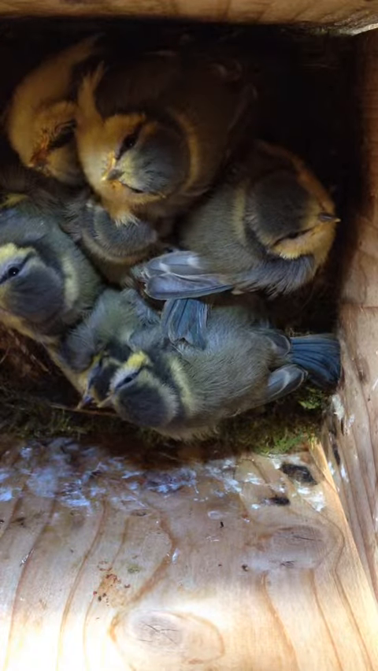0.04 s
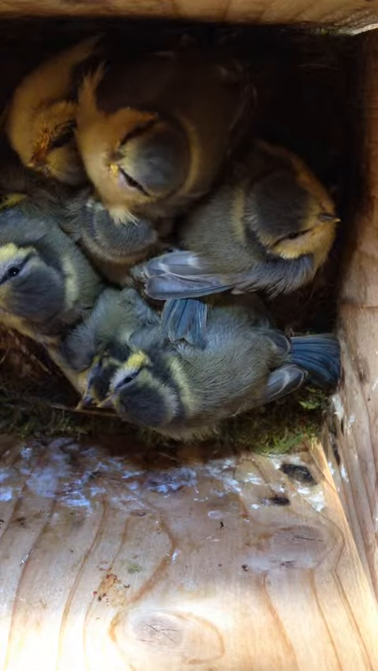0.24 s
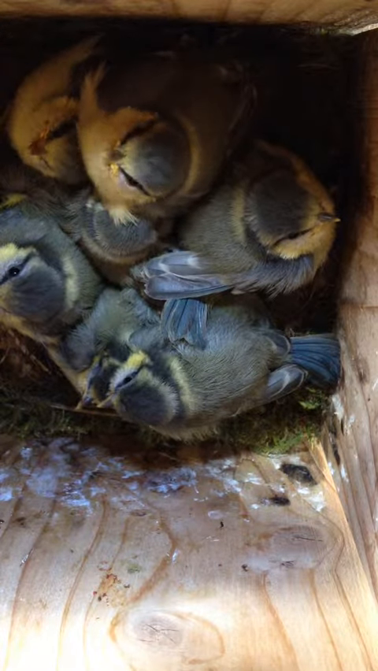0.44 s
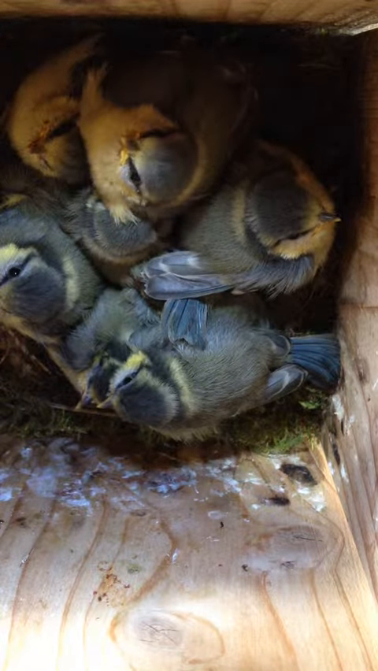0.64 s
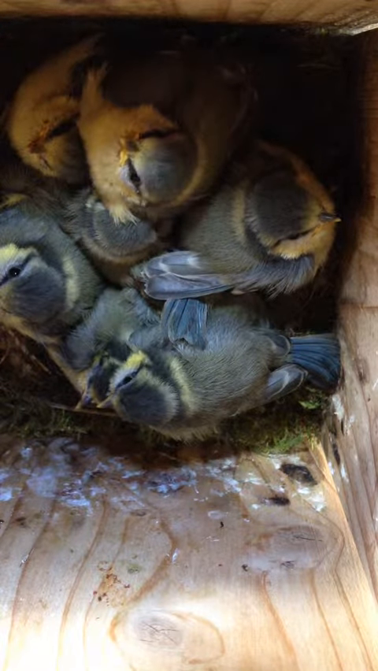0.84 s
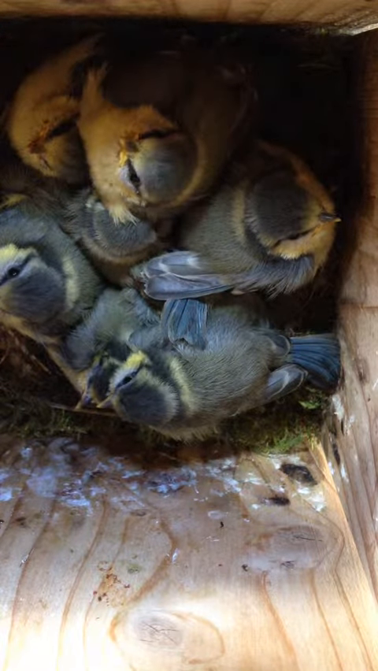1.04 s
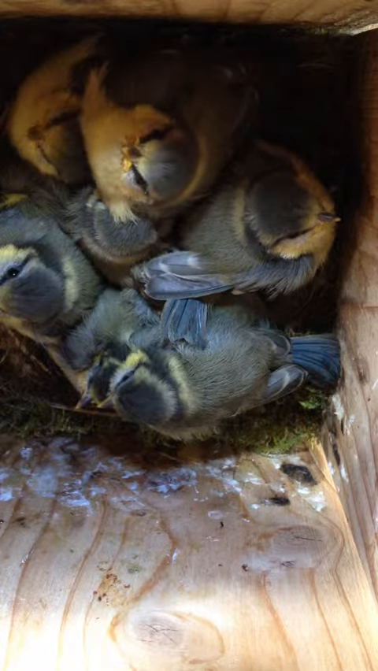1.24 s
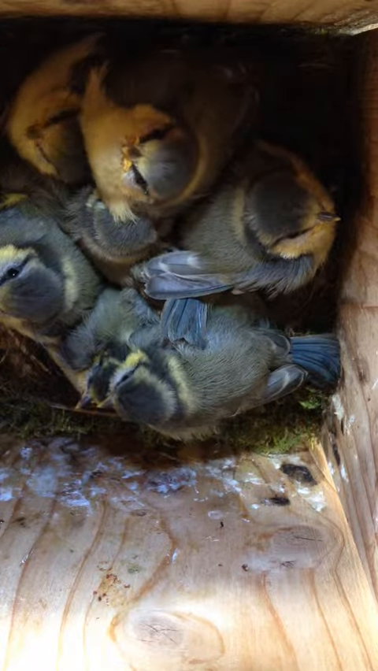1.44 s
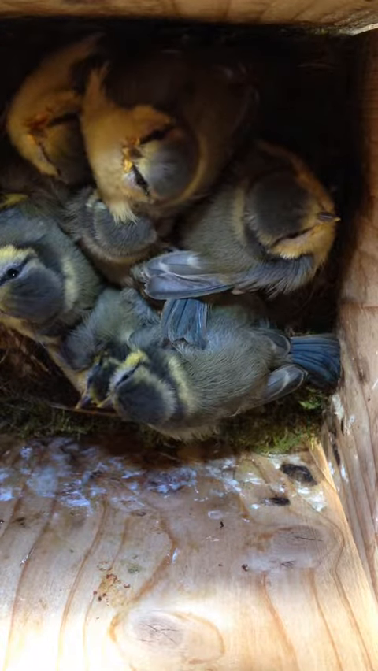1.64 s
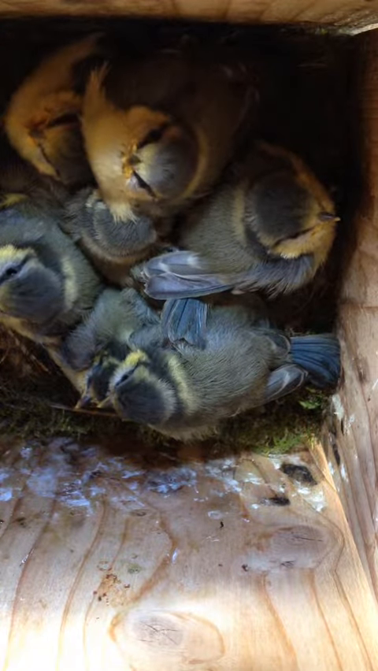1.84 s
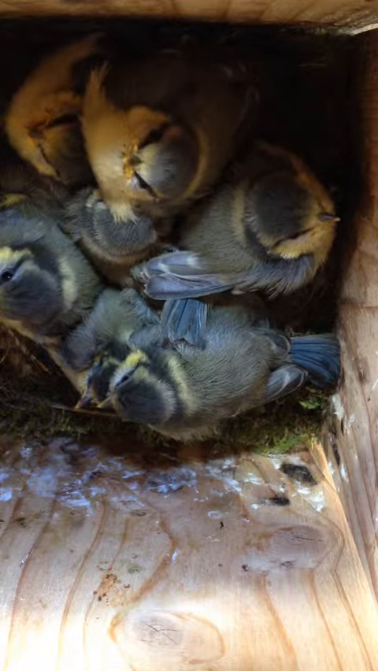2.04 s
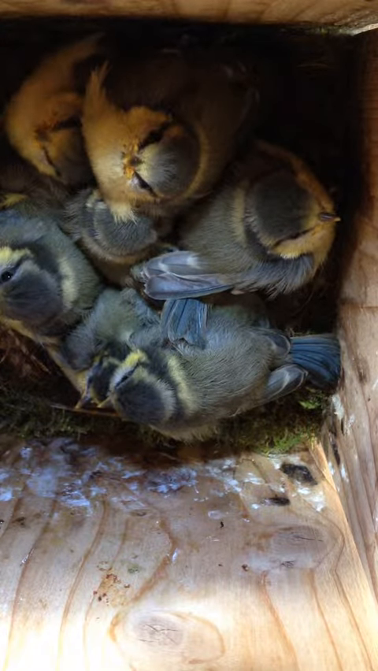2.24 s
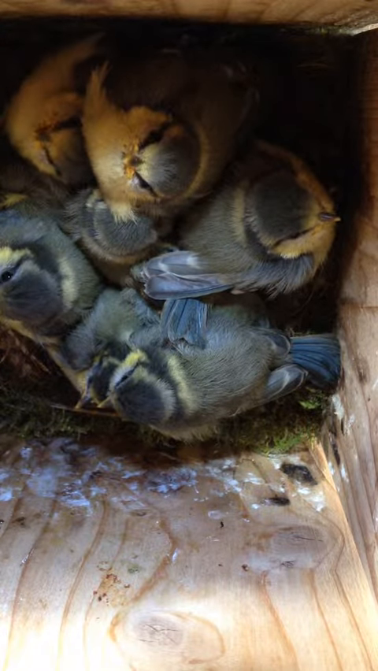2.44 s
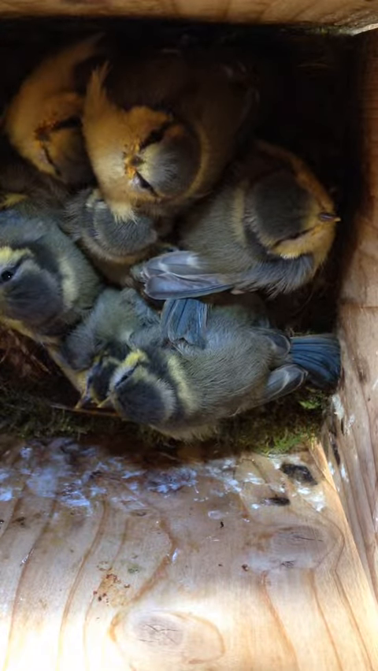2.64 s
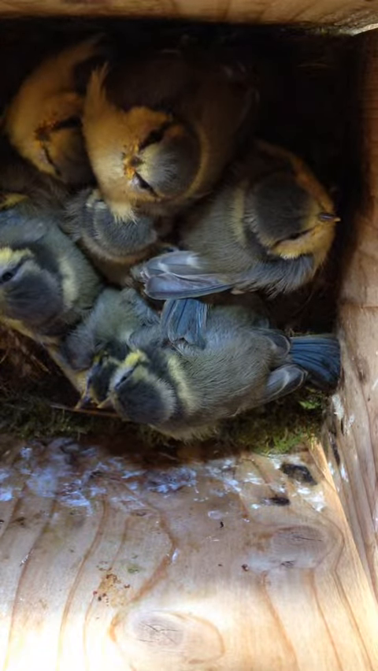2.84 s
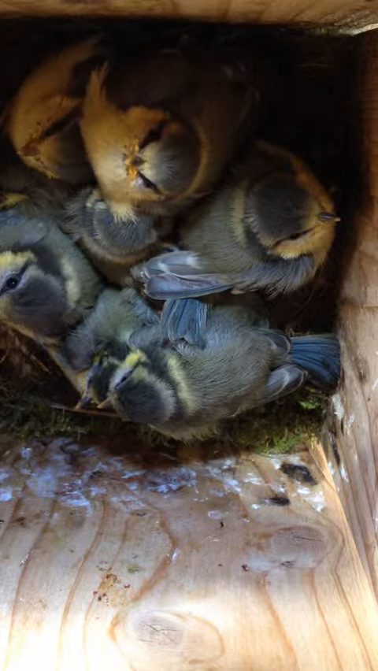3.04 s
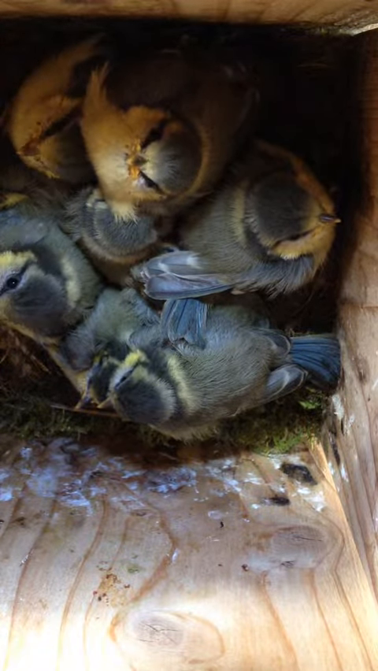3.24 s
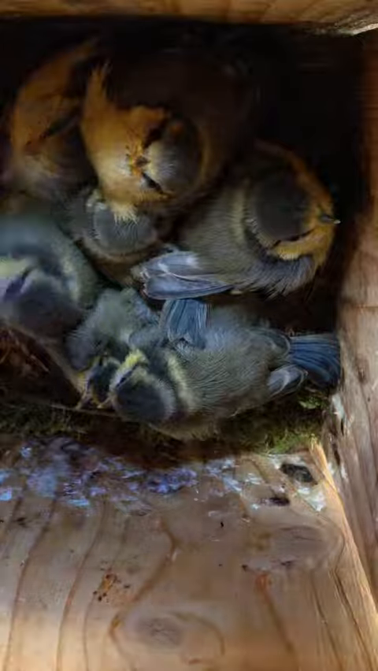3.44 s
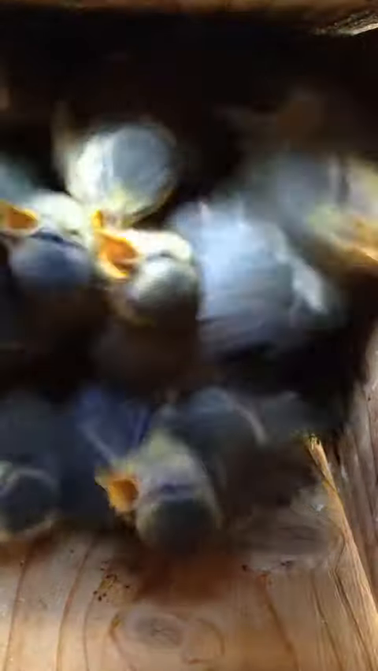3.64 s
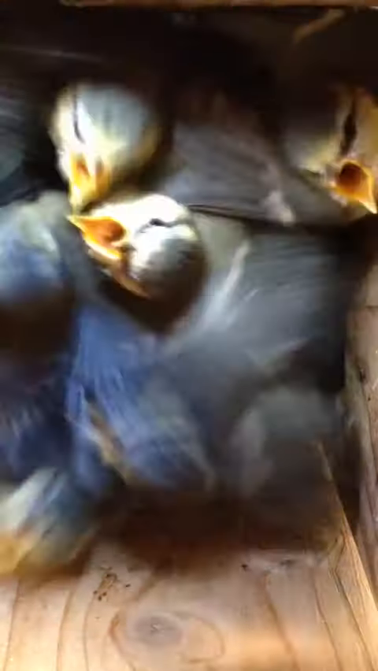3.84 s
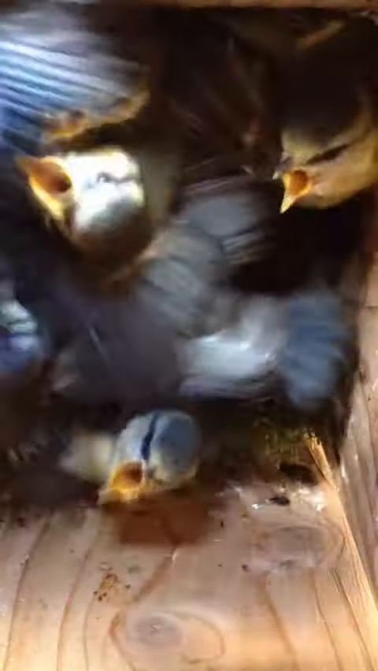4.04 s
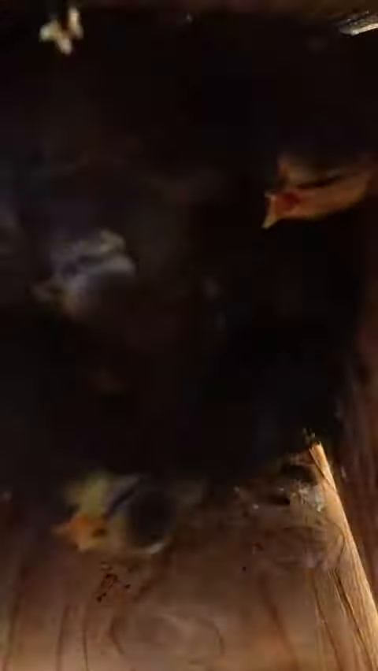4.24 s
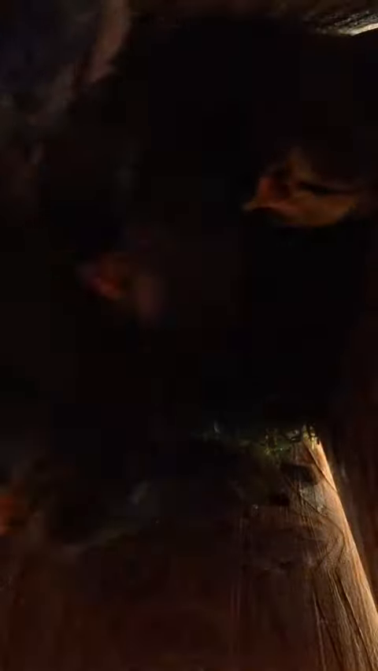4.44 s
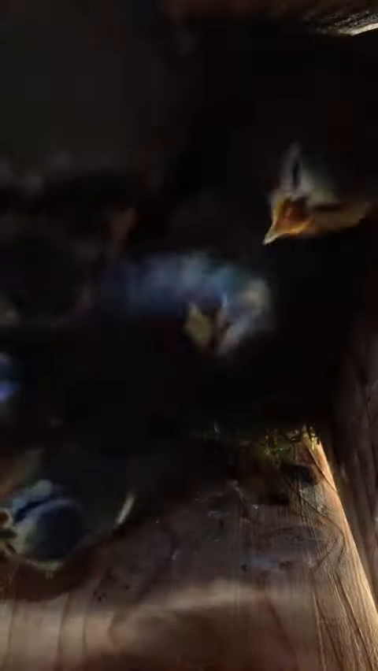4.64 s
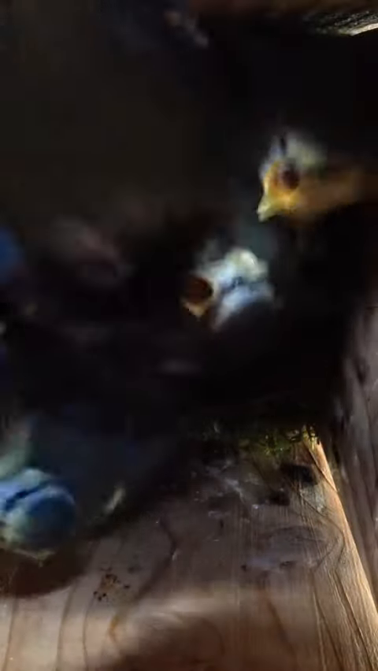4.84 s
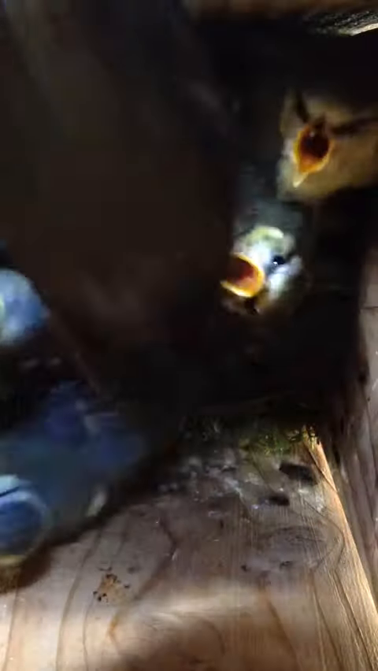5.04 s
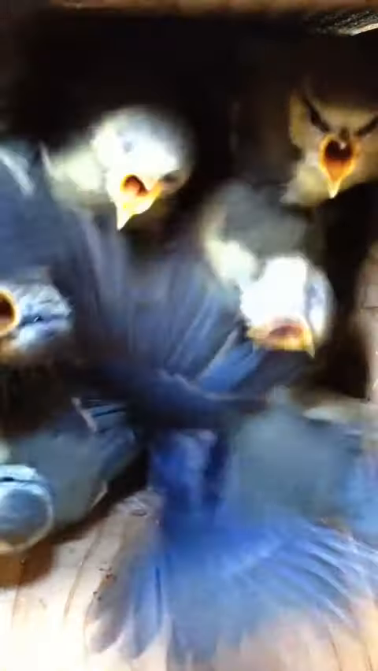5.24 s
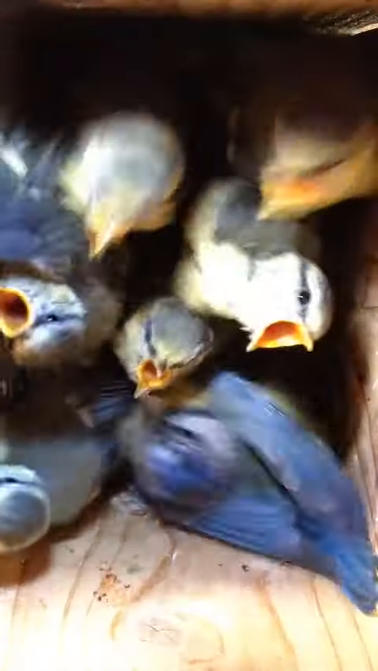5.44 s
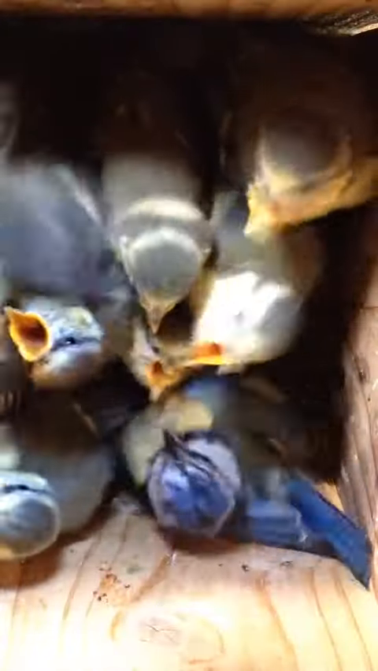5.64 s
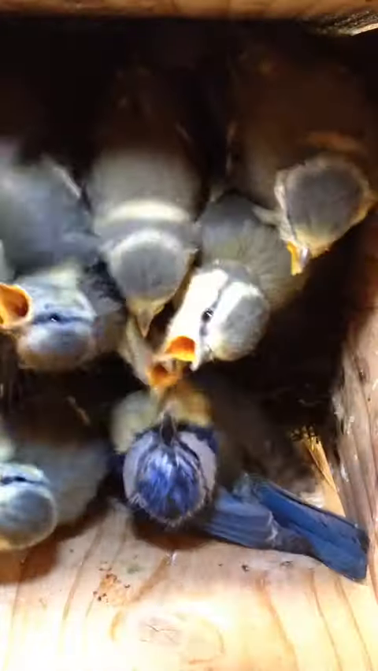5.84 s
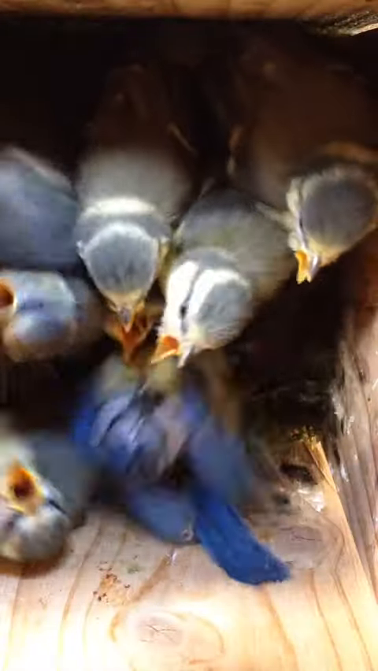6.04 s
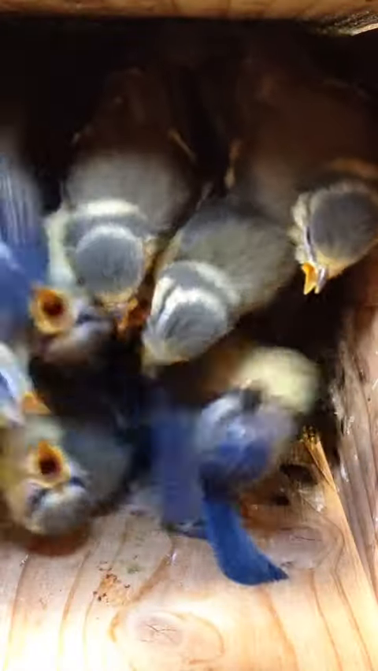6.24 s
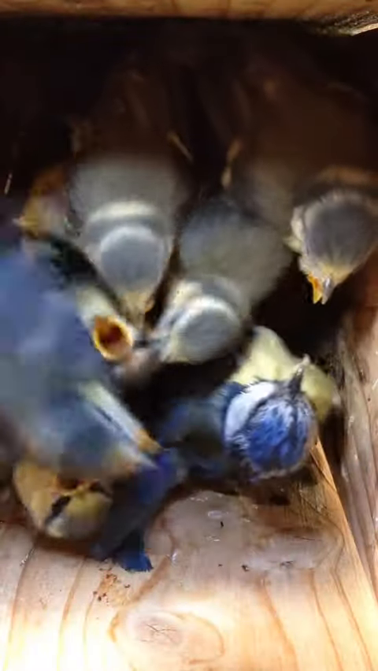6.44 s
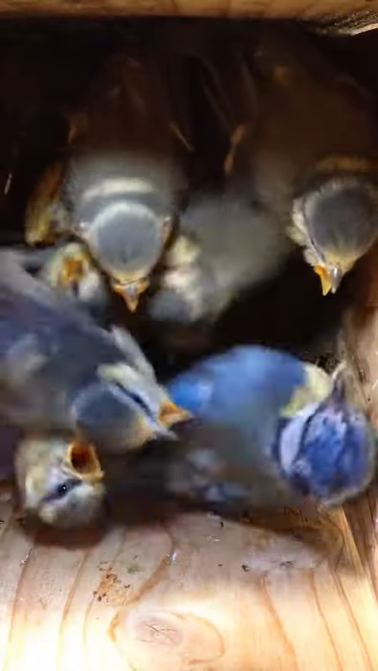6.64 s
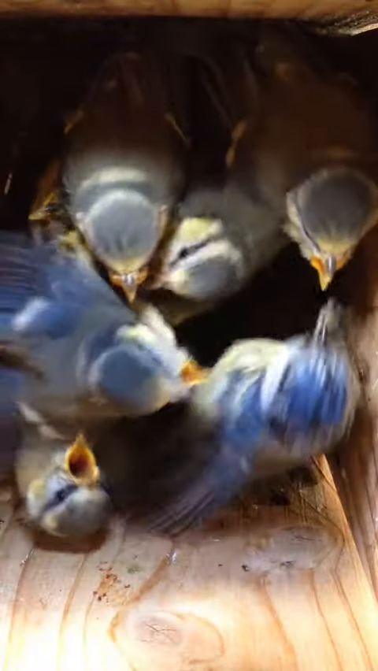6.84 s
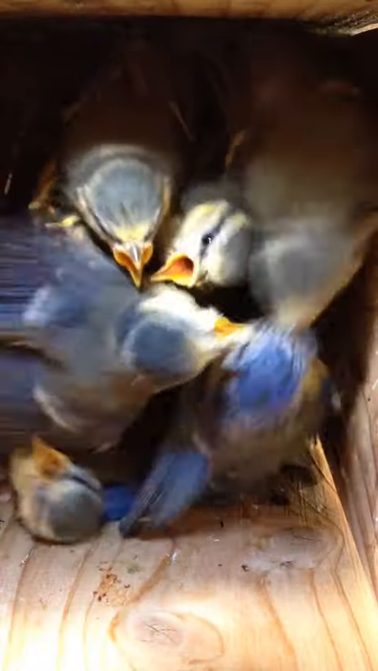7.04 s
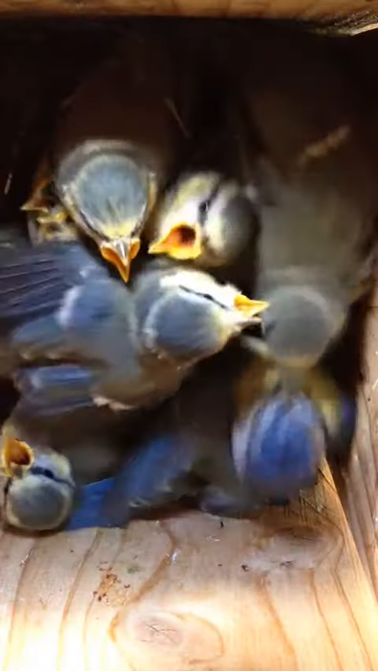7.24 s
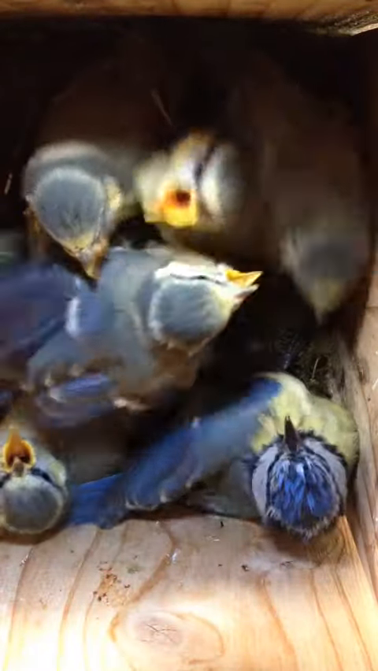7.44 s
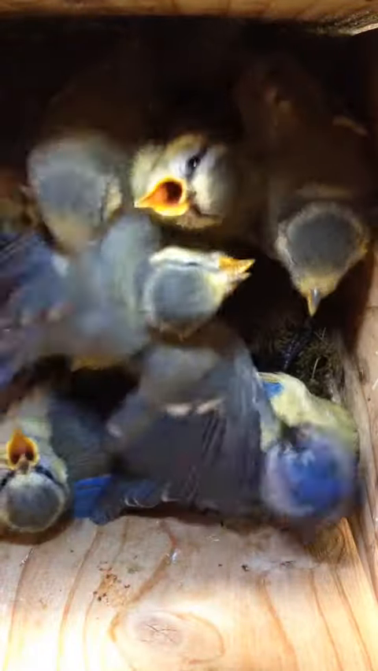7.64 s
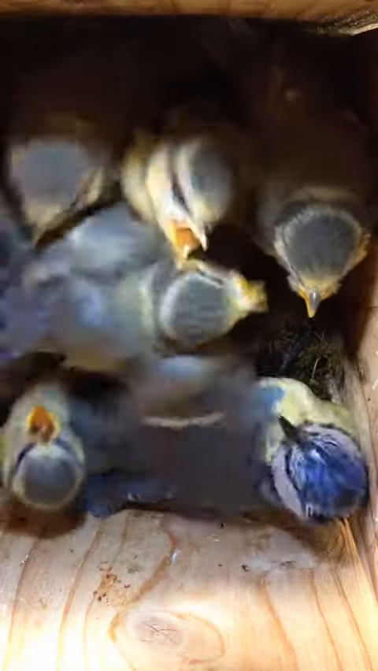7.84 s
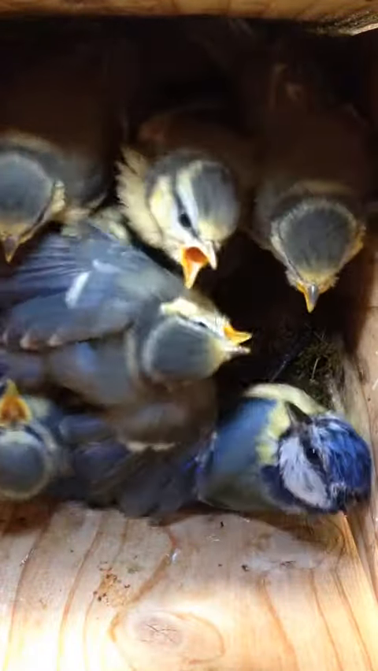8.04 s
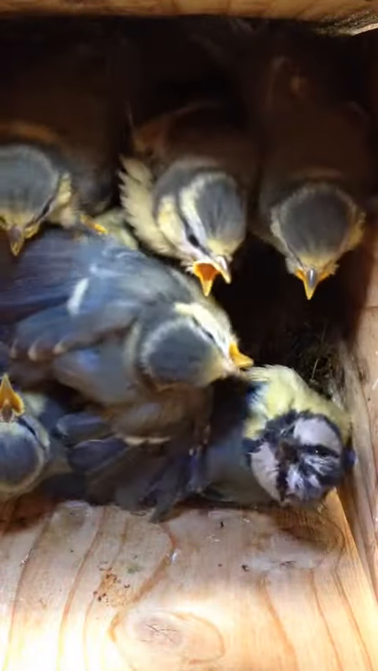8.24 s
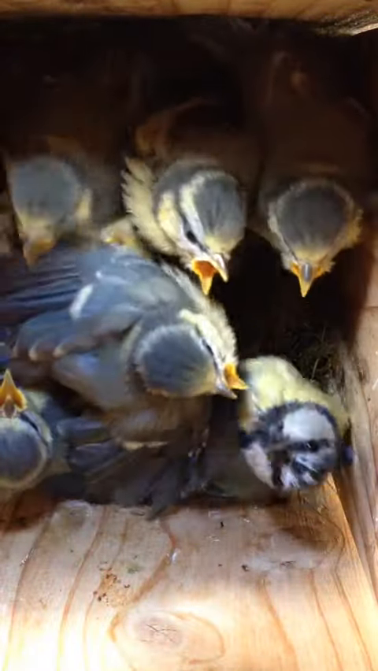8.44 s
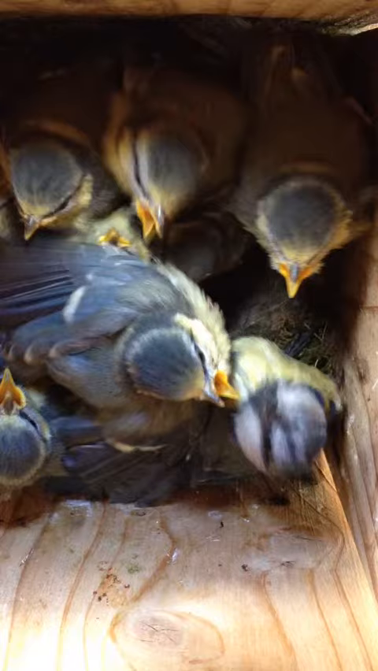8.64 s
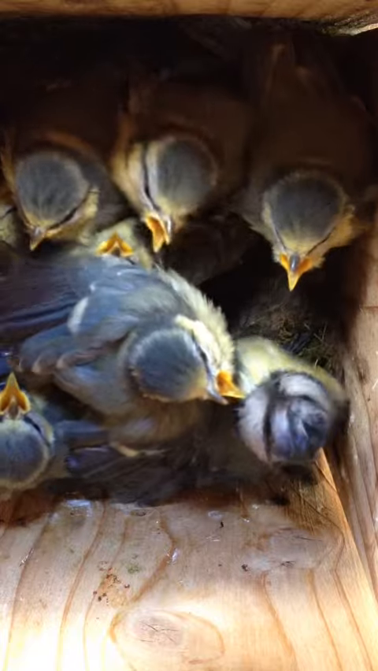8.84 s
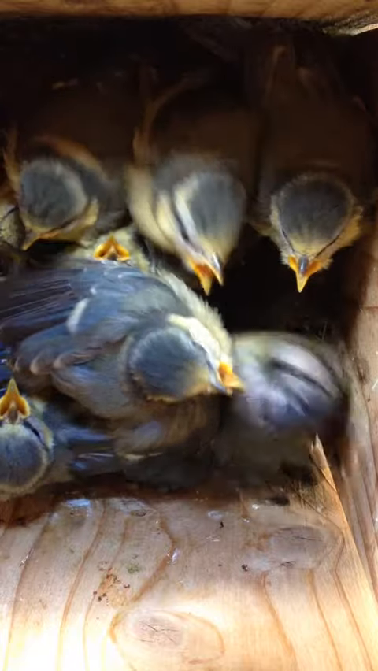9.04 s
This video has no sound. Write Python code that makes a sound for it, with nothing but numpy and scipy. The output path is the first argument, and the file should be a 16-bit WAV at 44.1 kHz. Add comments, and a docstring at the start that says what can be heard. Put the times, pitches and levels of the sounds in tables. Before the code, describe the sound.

Inside a wooden nest box, a lone chick's few thin calls give way to a frantic shrill begging chorus when a parent lands.

```python
"""Shrill whistles, low arched cries and hoarse rasps: nestlings beg inside a small wooden nest box, heard up close.
One chick gives five calls, then a parent lands at the hole and the whole brood joins in.
Whistles and cries are gliding tones from the two sides of the syrinx (a bird's voice organ); rasps mix
rough voices with breath noise. Wings rustle as shaped noise, feet ring the boards and claws scratch them.
Far traffic booms in the box as steady noise, and a bird outside sings quick falling notes."""
import sys
import numpy as np
from scipy import signal
from scipy.fft import rfft, irfft, next_fast_len
from scipy.io import wavfile
from scipy.ndimage import map_coordinates

SR = 44100
rng = np.random.default_rng(int(sys.argv[2]) if len(sys.argv) > 2 else 0)


def int16_out(signal):
    """Quantize to a 16-bit WAV file."""
    q = np.round(np.clip(np.atleast_2d(signal).T, -1, 1) * 32767)
    wavfile.write(sys.argv[1], SR, q.astype(np.int16))


N = 401310  # length of the scene [samples]
STRAIN_FROM_S = 6.4  # from here on the voices strain more and more


def amp(db):
    """Turn decibels into a plain factor."""
    return 10 ** (np.asarray(db) / 20)


def unit(x):
    """Scale a sound to an average (RMS) strength of 1."""
    return x / np.sqrt(np.mean(x ** 2) + 1e-20)


def along(points, hz):
    """Read a curve of (frequency [Hz], value) points, spaced by ratio as the ear hears pitch."""
    f, v = np.transpose(points)
    return np.interp(np.log(hz + 1), np.log(f + 1), v)


def wobble(rate, size):
    """A smooth random curve with rate random points a second."""
    knots = rng.standard_normal(int(N * rate / SR) + 4)
    return map_coordinates(knots, [np.arange(size) * rate / SR])


def filtered(x, response):
    """Make each frequency stronger or weaker by the factor response(hz)."""
    m = next_fast_len(len(x) + 8192)
    hz = np.fft.rfftfreq(m, 1 / SR)
    return irfft(rfft(x, m) * response(hz), m)[:len(x)]


def add(track, s, piece):
    """Lay a piece into a track at time s, cutting what runs past the end."""
    room = track[max(round(s * SR), 0):][:len(piece)]
    room += piece[:len(room)]


def swell(length, db, fade_db, edge):
    """Progress 0-1 of a call and its gain: soft ends of edge seconds, level changing by fade_db midway."""
    t = np.arange(round(length * SR)) / SR
    u = t / length
    ends = np.sin(np.pi / 2 * np.clip(np.minimum(t, length - t) / edge, 0, 1)) ** 2
    return u, ends * amp(db + fade_db * np.interp(u, [.3, .7], [-.5, .5]))


def phase_of(hz, jitter, rate=250):
    """Running phase of a tone whose pitch trembles, with rate random points a second."""
    trembling = hz * (1 + jitter * wobble(rate, len(hz)))
    return 2 * np.pi * np.cumsum(trembling) / SR + rng.uniform(0, 2 * np.pi)


def echoes(x, t60):
    """A dense tail of reflections that fades 60 dB in t60 seconds, with total energy 1."""
    t = np.arange(SR // 4) / SR
    tail = rng.standard_normal(len(t)) * amp(-60 * t / t60)
    return signal.fftconvolve(x, tail / np.linalg.norm(tail))[:N]


def whistles():
    """Both membranes of the syrinx glide together; they share one airflow, so sum and difference tones appear."""
    # whistled notes: (start after the swoop [s], nominal length [s], middle pitch of the lower membrane [Hz],
    # glide over the note [%], final plunge [%], relative level [dB], upper membrane against lower [dB])
    notes = [(1.565, 0.078, 6640, -9, 20, -7, -14), (1.564, 0.036, 8100, -10.5, 3, -9, -30),
             (1.75, 0.085, 6084, -9, 13, -7.5, -0.5), (1.94, .055, 5910, -5.5, 18, -7, 0.5),
             (1.993, 0.039, 5880, -47, 4.4, -11, -35), (3.618, 0.0455, 7410, -4, 4.7, -3, -9.5),
             (3.674, 0.044, 7210, -3, 5.7, -18.5, 3.5), (3.747, .084, 7265, -9.5, 2.6, -2, -28),
             (3.764, 0.16, 7970, -11, 1, -16.5, -19), (3.821, .09, 9790, -8.5, 1.03, -21, -39),
             (3.828, 0.043, 6730, -4, 13, -11.5, 0.5), (3.889, 0.021, 7740, -7, 5, -5.5, -22),
             (3.935, 0.06, 6890, -12, 2.1, -7.5, -19), (3.994, 0.085, 7450, -13.5, 2.63, -7.5, -18),
             (4.112, 0.034, 6350, -7, 14, -8.5, -1.5), (4.228, 0.044, 4690, 17.5, 1, -10, -27),
             (4.253, 0.034, 7810, 3.5, 10, -11, -36), (4.8, .042, 5880, -41, 41, -13.5, 2),
             (4.867, 0.031, 7090, 1, 14, -11, -10), (4.974, 0.063, 6536, -11.5, 2.5, -9, -1.5),
             (5.123, 0.056, 6410, -12.5, 2.5, -11, -3), (5.26, 0.039, 4680, 10, 1, -11.5, -24),
             (5.561, 0.035, 7090, 1.5, 20, -11, 4.5), (5.67, 0.064, 6280, -9.5, 28, -13.5, 7),
             (5.822, 0.037, 6310, -9, 30, -18.5, 6), (5.86, .032, 4300, -45, 15, -18, -8),
             (6.05, 0.044, 6830, -5.5, 3, -11.5, -6), (6.136, 0.033, 6900, -5.5, 10, -9, -5.5),
             (6.15, 0.038, 7880, -6.5, 2.5, -6, -19), (6.18, 0.05, 7070, -7.5, 5.3, -7.5, -10),
             (6.239, 0.026, 6740, -8, 9.8, -10, -0.5), (6.264, 0.071, 7630, -11, 1.6, -6, -39),
             (6.292, 0.045, 9670, -13, 2, -19, -37), (6.313, 0.066, 6560, -14, 7.2, -8, -9),
             (6.467, 0.095, 6700, -5.5, 14, -14, -25), (6.786, .022, 7630, 1, 10, -5, -24),
             (6.897, .037, 6760, -7, 44, -11.5, 2.5), (6.936, .07, 5750, -18, 3, -22, -23),
             (7.537, 0.024, 6710, -1.5, 14.7, -10.5, -6), (7.642, 0.053, 6435, -10, 5.5, -9, -5),
             (7.789, .04, 5800, -9.5, 10, -13.5, -17.5), (7.888, 0.085, 6700, 21.5, 22, -10, -32),
             (7.988, 0.022, 6660, 23, 3, -17, -20), (8.125, 0.03, 7510, -6, 9.2, -17, -7),
             (8.259, 0.045, 6890, -14, 1.8, -6, -12), (8.404, 0.05, 4800, -19, 49, -22, -20),
             (8.469, .048, 6285, -14, 1.2, -6, -5), (8.63, 0.052, 6430, -13, 3.7, -11, -24),
             (8.787, 0.083, 5930, 11.5, 20.5, -13.5, -26.5), (8.978, 0.082, 5650, 12.5, 13.7, -13, -18),
             (9.086, 0.022, 7370, -0.5, 1, -7, -1)]
    swoop_s, extra_s = .008, .012  # each note starts this early, and lasts this much longer than listed
    swoop, rise_s, fall_s = 0.61, .0045, .012  # share of pitch missing at the start; swoop and plunge times [s]
    interval = 1.235  # pitch ratio of upper to lower membrane at mid note
    strain = .0025  # pitch tremble gained with each second of straining
    out = np.zeros(N)
    for s, length, hz, glide, plunge, db, upper_db in notes:
        u, gain = swell(length + extra_s, db, fade_db=-1, edge=.014)
        t = u * (length + extra_s) - swoop_s
        swoop_up = swoop * np.exp(-(t + swoop_s) / rise_s)
        plunge_down = plunge / 100 * np.exp((t - length) / fall_s)
        lower_hz = hz * (1 - swoop_up - plunge_down) * (1 + glide / 100 * (t / length - .5))
        upper_hz = lower_hz + (interval - 1) * hz
        lower = np.sin(phase_of(lower_hz, 0.0042 + strain * max(s - STRAIN_FROM_S, 0), 400))
        both = lower + amp(upper_db) * np.sin(phase_of(upper_hz, 0.0083))
        # the square and cube bring the extra tones
        tone = both + amp(-23.0) * (both ** 2 - np.mean(both ** 2)) - amp(-32.5) * both ** 3
        add(out, s - swoop_s, gain * amp(1.5 * wobble(70, len(u))) * tone)
    # a small beak passes only a band of pitches
    return filtered(out, lambda hz: 1 / np.sqrt(1 + (2500 / (hz + 1)) ** 4) / np.sqrt(1 + (hz / 12500) ** 6))


def cries():
    """An arched low note whose overtones the open beak favours; the other membrane beats against it."""
    # low cries: (start [s], length [s], top pitch [Hz], relative level [dB], overtones against the note [dB],
    # beating depth [0-1])
    calls = [(2.122, .115, 2915, -32, 16.5, 1), (2.328, .115, 2705, -34, 16, 1),
             (4.089, 0.09, 2686, -32, 2.5, 0.4), (4.171, 0.066, 3440, -26.5, -3, 0.3),
             (4.239, 0.06, 2648, -26, 11, 0.5), (4.369, 0.071, 2700, -28, 4, 0.36),
             (4.425, .075, 3193, -26, 6.5, 0.3), (4.51, 0.054, 2700, -25.5, -2, 0.34),
             (4.553, 0.06, 3460, -22.5, -18, .5), (4.647, 0.068, 2680, -28, 0, 0.34),
             (4.92, 0.068, 2750, -26.5, 10.5, .6), (5.075, .072, 2703, -25, 0, 0.5),
             (5.22, 0.079, 2590, -25, -3, 0.5), (5.392, 0.08, 2430, -35.5, 22, 0.2),
             (6.01, 0.084, 2850, -29.5, 6, 0.4), (6.157, .07, 2920, -32.5, 0, .3),
             (6.324, 0.062, 2930, -44, 2, 0.33), (6.441, 0.075, 2770, -30.5, 7.5, .4),
             (6.609, 0.052, 2920, -26, 7, .4), (6.615, 0.056, 2626, -30, -0.5, .4),
             (6.747, 0.065, 2670, -28.5, 7, 0.2), (6.749, .06, 3020, -31, 11.5, .4),
             (7.583, .04, 2900, -37.5, 19, 0.3), (7.713, 0.05, 3075, -29, 20.5, 0.45),
             (8.059, .065, 2660, -33.5, 14.5, .3), (8.207, .07, 2433, -33.5, 4.5, .3),
             (8.392, 0.062, 2475, -32.5, -6.5, .4)]
    climb, steepens = 2.7, .7  # share of top pitch climbed a second; how much steeper per second of straining
    top_at, roundness = .58, 2.1  # share of the call spent rising; 2 is round, beating points it toward 1
    out = np.zeros(N)
    for s, length, top_hz, db, overtones_db, depth in calls:
        u, gain = swell(length, db, 0, edge=0.015)
        steepness = climb * (1 + steepens * max(s - STRAIN_FROM_S, 0)) * length
        arch = top_hz * (1 - steepness * abs(u / top_at - 1) ** (roundness - depth))
        arch = arch * (1 + .035 * depth ** 2 * wobble(70, len(u)))
        phase = phase_of(arch, .003 + .008 * depth ** 2, 500)
        second = amp(3 * wobble(60, len(u))) * np.sin(2 * phase)
        third = amp(-7 + 5 * wobble(40, len(u))) * np.sin(3 * phase)
        beating = 1 + depth * np.cos(phase_of(.64 * arch, .025, 400))
        beating = beating + depth / 4 * np.cos(phase_of(.3 * arch, .08, 400))
        voice = np.sin(phase) + amp(overtones_db) * (second + third) * beating
        add(out, s, gain * amp(1.8 * wobble(89, len(u))) * voice)
    return filtered(out, lambda hz: 1 / np.sqrt(1 + (hz / 7900) ** 24))  # little passes above the beak's resonance


def rasps():
    """Four rough voices screech at once; breath noise fills between their overtones."""
    # hoarse calls: (start [s], nominal length [s], relative level [dB], high part against low part [dB])
    calls = [(1.556, 0.0052, -20.5, 14), (1.744, 0.002, -27, 5.5), (1.934, 0.002, -22.5, 2),
             (1.992, 0.038, -19.5, 1.5), (2.124, 0.1, -20, -0.5), (2.332, 0.098, -20.5, -2.5),
             (3.597, 0.018, -8, 5), (3.661, 0.099, -17.5, 1), (3.757, 0.17, -28.5, -15.5),
             (3.944, 0.076, -17.5, 4.5), (4.084, 0.22, -19, -2), (4.299, 0.313, -20, -6),
             (4.618, 0.21, -18.5, -7.5), (4.841, 0.038, -13.5, -4), (4.895, 0.12, -14, -3),
             (5.038, 0.19, -21, -2), (5.199, .18, -17, -1), (5.386, 0.12, -21, 0), (5.436, 0.13, -15, -4.5),
             (5.572, 0.054, -27, 7), (5.615, 0.084, -20, -5), (5.714, 0.022, -26, 27),
             (5.814, 0.095, -17.5, 7), (5.923, 0.077, -15.5, -3.5), (5.999, 0.074, -13, 2.5),
             (6.088, 0.13, -19.5, 3), (6.173, 0.066, -24.5, -3.5), (6.262, 0.15, -20, 1),
             (6.404, 0.14, -16, 1), (6.547, 0.16, -15.5, -0.5), (6.71, .11, -19, 7.5), (6.841, 0.1, -20, 0),
             (6.95, 0.12, -20.5, 1), (7.071, 0.062, -19.5, 1), (7.16, 0.15, -18, 2.5),
             (7.333, 0.031, -20, -15.5), (7.408, 0.096, -17, 0), (7.493, 0.072, -17.5, 4),
             (7.577, 0.19, -20.5, 2), (7.771, 0.093, -16.5, 1.5), (7.873, 0.22, -16, 4.5),
             (8.095, 0.2, -16, 6), (8.302, 0.091, -13.5, 8.5), (8.381, 0.081, -14, 10),
             (8.495, 0.21, -16, 3), (8.709, 0.085, -17.5, 6.5), (8.789, .12, -15, 2.5),
             (8.929, 0.07, -13.5, 3), (9, 0.1, -14.5, 7)]
    # gaping beaks in the box: (frequency [Hz], relative level per Hz [dB])
    throat = [(400, -58.5), (850, -39), (1120, -17.5), (1400, -30), (1650, -13), (2500, -20.5),
              (3200, -7.5), (4200, -4), (5800, -6.5), (7600, -1), (8200, -6), (8900, -12.5), (10000, -22),
              (15800, -33)]
    # the lone chick hisses; as the brood strains, voices break into noise: (time [s], noise share [0-1])
    hoarse = [(3.65, .85), (4.05, .5), (5.6, .5), (7.3, .72)]
    brood_s = 3  # before this one chick calls alone, with more abrupt edges
    dull, bright = np.zeros(N), np.zeros(N)
    for s, length, db, bright_db in calls:
        u, gain = swell(length + 0.035, db, fade_db=-0.04, edge=0.051 if s > brood_s else .02)
        share = np.interp(s, *np.transpose(hoarse))
        voices = unit(sum(screech(len(u)) for voice in range(4)))
        breath = unit(amp(2.5 * wobble(400, len(u))) * rng.standard_normal(len(u)))
        call = np.sqrt(1 - share ** 2) * voices + share * breath
        call *= gain * amp(1.59 * wobble(55.3, len(u)))
        add(dull, s - .015, call * amp(-bright_db / 2))
        add(bright, s - .015, call * amp(bright_db / 2))

    def upper(hz):
        """Share above the beak's lower resonance."""
        return 1 / (1 + (5500 / (hz + 1)) ** 8)

    low = filtered(dull, lambda hz: amp(along(throat, hz)) * (1 - upper(hz)))
    high = filtered(bright, lambda hz: amp(along(throat, hz)) * upper(hz))
    return amp(11.0) * low + amp(10.0) * high


def screech(size):
    """One rough voice: arched syllables that swoop up to a plateau, two membranes beating unsteadily."""
    syllable = (np.arange(size) / SR * rng.uniform(8, 14) + rng.uniform()) % 1  # progress 0-1, 8-14 a second
    arch = .65 + .75 * np.sin(np.pi * syllable ** rng.uniform(.6, 1.6)) ** .25
    arch = arch * rng.uniform(.85, 1.25)
    left = phase_of(1900 * arch, .011, 600)
    right = phase_of(rng.uniform(600, 1100) * arch, .055, 400)
    overtones = sum(amp(4 * wobble(60, size)) * np.cos(k * left) for k in range(2, 6))
    return np.sin(np.pi * syllable) ** .6 * (.4 * np.cos(left) + overtones * (1 + .9 * np.cos(right)))


def rustle():
    """Fluttering wings: feathers brush feathers and moss, a hiss of unsteady strength."""
    # strength of the flutter: (time [s], level [dB])
    flutter = [(3.4, -95.5), (3.6, -44), (5.3, -46), (9.1, -49)]
    s, db = np.transpose(flutter)
    color = [(200, -11.5), (700, -5.5), (3000, -6.0), (15000, -16.5)]  # (frequency [Hz], level [dB])
    hiss = filtered(rng.standard_normal(N), lambda hz: amp(along(color, hz)))
    return amp(np.interp(np.arange(N) / SR, s, db) + 4.5 * wobble(25, N)) * unit(hiss)


def perch():
    """The parent's feet hit the rim of the hole, and each blow makes it ring."""
    # landing blows: (time [s], relative level [dB])
    blows = [(3.435, -21), (3.456, -28)]
    # what the rim rings with: (frequency [Hz], relative level [dB], time to fade 60 dB [s])
    rim = [(473, -2.5, 0.024), (1520, -5.5, 0.029), (2130, 3, 0.025)]
    out, t = np.zeros(N), np.arange(SR // 20) / SR
    for s, db in blows:
        ring = sum(amp(level - 60 * t / t60) * np.sin(phase_of(hz + 0 * t, .08, 600)) for hz, level, t60 in rim)
        add(out, s, amp(db) * ring * (1 - np.exp(-t / .0006)))
    return out


def boards():
    """Knocks ring the box briefly, each with a dull noisy thud; claws give short scratchy puffs."""
    # feet and wings on the boards: (time [s], relative level [dB])
    knocks = [(3.433, -38.5), (3.667, -30), (3.737, -33.5), (3.858, -35), (4.228, -32.5), (4.281, -37.5),
              (4.334, -33), (4.421, -29.5), (4.491, -36), (4.565, -42), (4.629, -34), (4.769, -36.5),
              (4.88, -40.5), (4.928, -35), (5.125, -37), (5.253, -31), (5.292, -37.5), (7.23, -33.5),
              (7.352, -35)]
    # claws on wood: (time [s], relative level [dB])
    scratches = [(.055, -57), (.31, -55), (.525, -56), (.948, -57), (2.5078, -48.5), (3.2522, -43.5),
                 (3.2935, -40.5), (3.3223, -47), (3.429, -34.5), (3.448, -37.5), (3.52, -34.5),
                 (3.535, -40), (3.579, -43.5)]
    # what the box rings with: (frequency [Hz], typical relative level [dB], time to fade 60 dB [s])
    box_tones = [(322.5, 8.5, 0.055), (434, 9, 0.031), (660, 10.5, 0.055)]
    thud_db, thud_s, thud_hz = -7.5, 0.06, 2200  # thud against knock level; time to fade 60 dB; upper edge
    rings, thuds, claws = np.zeros(N), np.zeros(N), np.zeros(N)
    t = np.arange(SR // 8) / SR
    for s, db in knocks:
        ring = 0
        for hz, level, t60 in box_tones:
            ring = ring + amp(level + rng.normal(0, 5) - 60 * t / t60) * np.sin(2 * np.pi * hz * t)
        add(rings, s, amp(db - 4) * ring * (1 - np.exp(-t / .004)))
        add(thuds, s, amp(db + thud_db - 60 * t / thud_s) * rng.standard_normal(len(t)))
    for s, db in scratches:
        puff = amp(db + 1.5 - 60 * t / 0.14) * (1 - np.exp(-t / 0.0014))
        add(claws, s, puff * rng.standard_normal(len(t)) * amp(4.2 * wobble(210, len(t))))
    thuds = filtered(thuds, lambda hz: (hz > 250) / (1 + (hz / thud_hz) ** 4))
    # (frequency [Hz], level [dB])
    color = [(120, -31), (300, 0), (2200, 2.5), (5500, 0.5), (15000, -14.0)]
    return rings + thuds + filtered(claws, lambda hz: amp(along(color, hz)))


def song():
    """A far bird repeats one falling note, smeared by echoes."""
    # song phrases: (start [s], length [s], notes a second, top pitch at the start [Hz],
    # bottom pitch at the start [Hz], pitch tremble [share], sinking over the phrase [share], relative level [dB])
    phrases = [(.72, .7, 75, 5000, 3200, .06, .2, -52), (2.66, .6, 15.7, 4000, 2700, .02, 0, -55.5)]
    out = np.zeros(N)
    for s, length, rate, top_hz, bottom_hz, tremble, sinking, db in phrases:
        u, gain = swell(length, db, 0, edge=length / 2.5)
        note = (u * length * rate) % 1  # progress 0-1 of each note
        hz = (top_hz + (bottom_hz - top_hz) * note ** 0.88) * (1 - sinking * u)
        add(out, s, gain * np.sin(np.pi * note ** .5) * np.sin(phase_of(hz, tremble)))
    return .45 * out + .9 * echoes(out, t60=.15)


def outside():
    """Far traffic and air: steady noise, colored by the box, that drifts a little."""
    # traffic and air heard through the box: (frequency [Hz], relative level per Hz [dB])
    color = [(30, -69), (101, -16), (140, -6.5), (285, -2.5), (420, -18.5), (610, -3.5), (805, -20),
             (1700, -20), (2600, -27.5), (3700, -24.5), (5900, -39.5), (7400, -30.5), (9200, -42.5),
             (15800, -53)]
    noise = filtered(rng.standard_normal(N), lambda hz: amp(along(color, hz)))
    return amp(-48.0 + 0.64 * wobble(3.52, N)) * unit(noise)


def box(x):
    """The close walls answer briefly with quick reflections."""
    return x + amp(-12) * echoes(x, t60=.045)


def scene():
    """Birds and knocks sound inside the box; the song and the far noise come from outside."""
    brood = whistles() + cries() + rasps() + rustle()
    inside = box(brood + boards() + perch())
    return (inside + song() + outside())[None]


def record(dry):
    """Gain control turns the level down by up to 4 dB as running loudness builds up, and back up at the same
    pace as it eases; the capsule rounds peaks and drops the bass."""
    top_hz, roll_hz = 15800, 15550  # nothing passes from the first on; the treble falls steeply at the second
    x = dry[0]
    loud = signal.lfilter([1e-4], [1, 1e-4 - 1], x ** 2)  # running power over about 0.23 s
    x = x * amp(-4 * loud / (loud + amp(-100)))  # at most 4 dB down
    x = x / (1 + np.abs(x / .66) ** 6) ** (1 / 6)  # peaks bend toward 0.66

    def response(hz):
        treble = (hz < top_hz) / (1 + (hz / roll_hz) ** 60)
        return treble / np.sqrt(1 + (110 / (hz + 1)) ** 6)

    return filtered(x, response)[None]


dry = scene()
out = record(dry)
int16_out(out)
```